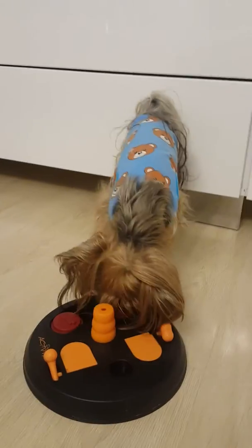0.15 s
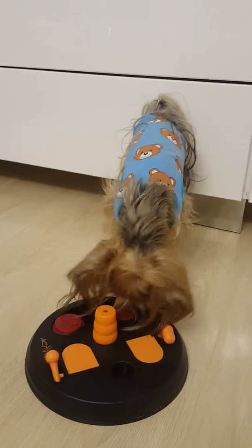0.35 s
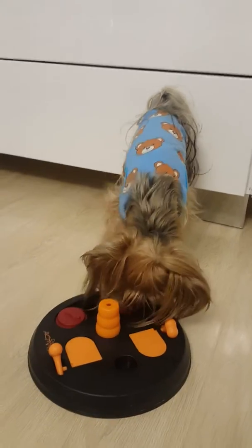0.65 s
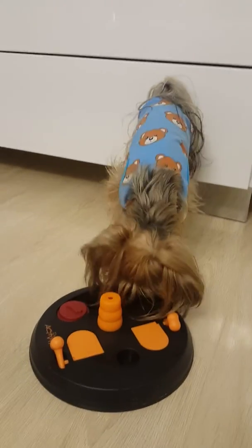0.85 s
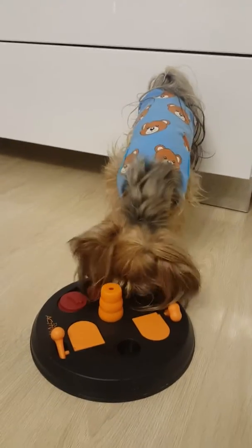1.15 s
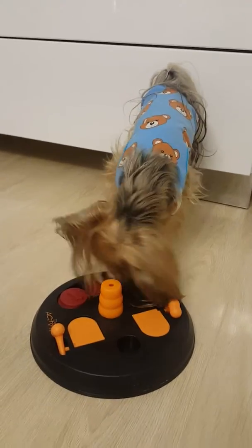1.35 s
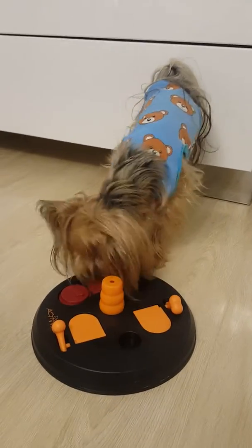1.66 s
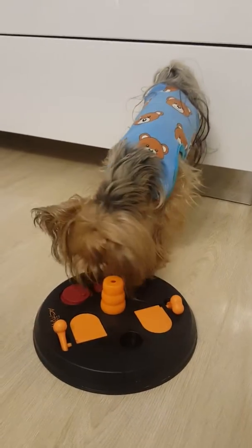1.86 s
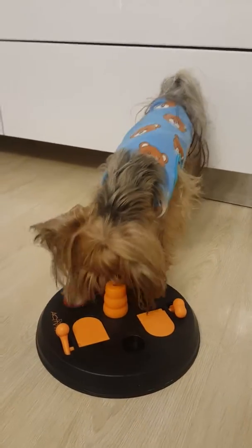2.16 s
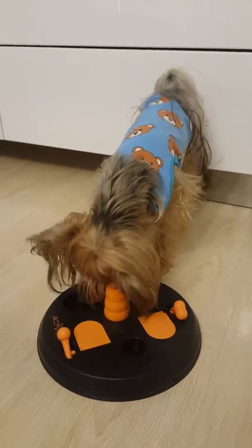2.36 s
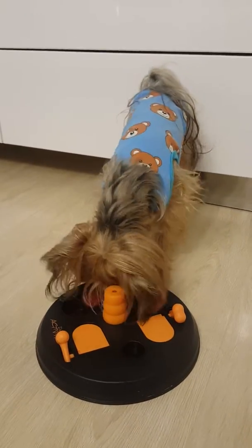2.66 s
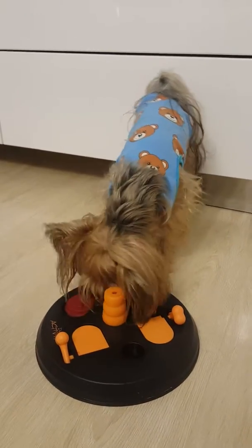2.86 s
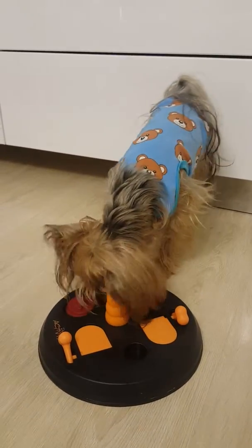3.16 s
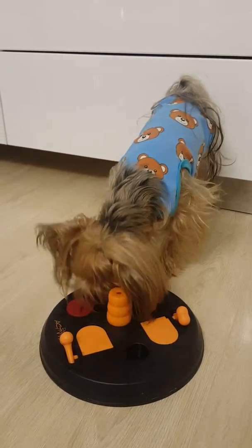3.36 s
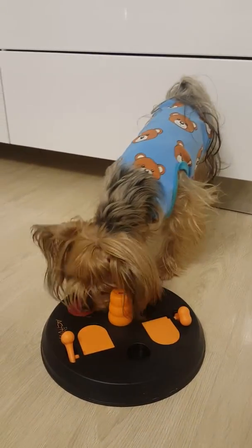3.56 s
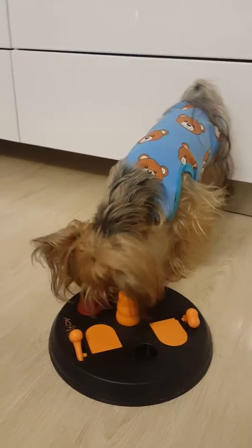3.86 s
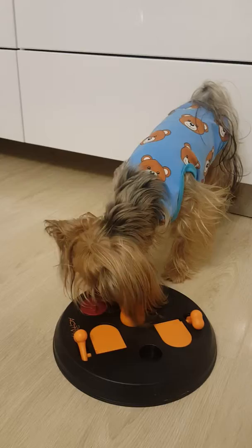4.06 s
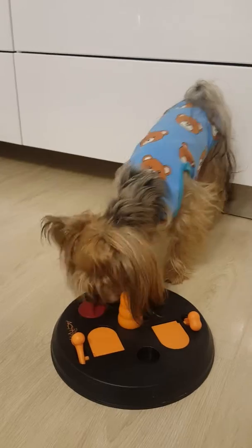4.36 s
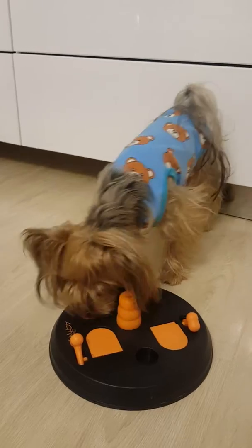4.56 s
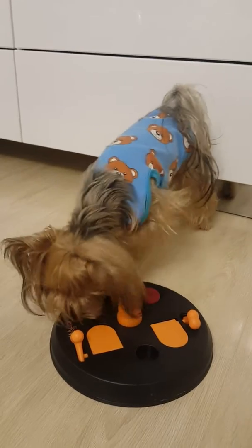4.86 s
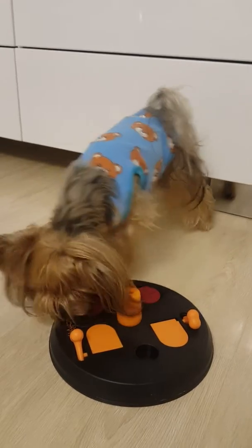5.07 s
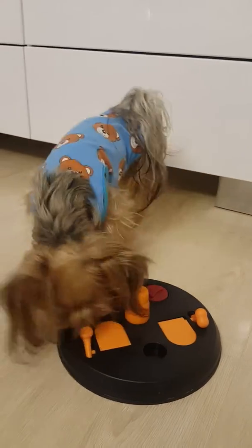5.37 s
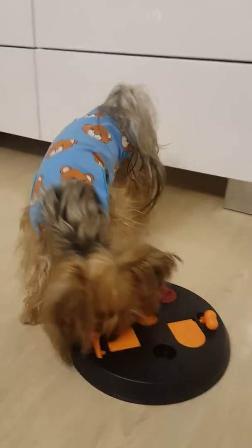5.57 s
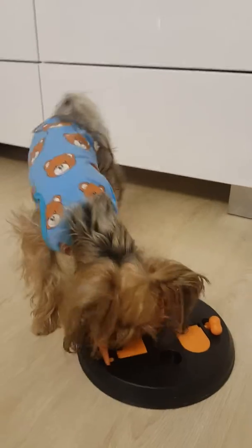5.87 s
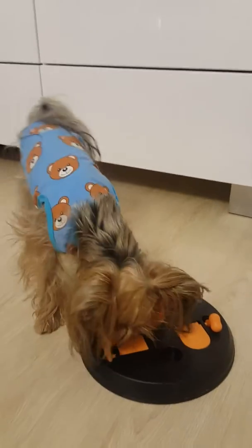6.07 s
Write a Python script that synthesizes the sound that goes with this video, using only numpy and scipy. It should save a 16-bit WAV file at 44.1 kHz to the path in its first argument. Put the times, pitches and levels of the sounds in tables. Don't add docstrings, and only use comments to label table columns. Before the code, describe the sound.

Hollow plastic clacks and rattles in sharp irregular bursts as a small dog noses a treat puzzle on a hard kitchen floor.

```python
import sys
import numpy as np
from scipy import signal
from scipy.fft import rfft, irfft
from scipy.io import wavfile

SR = 44100
rng = np.random.default_rng(int(sys.argv[2]) if len(sys.argv) > 2 else 0)


def ratio(d):
    e = np.asarray(d, float) / 20
    return 10 ** e


def master_out(mix):
    frames = np.transpose(np.atleast_2d(mix))
    ceiling = np.clip(frames, -1, 1)
    pcm = np.round(ceiling * 32767).astype(np.int16)
    wavfile.write(sys.argv[1], SR, pcm)


N = 273859

# contact in seconds, slider level in dB,
# weight on the body in dB, hardness of the contact in dB.
TRAY_BLOWS = [(0.5958, -48.5, 5.5, -6.5), (0.9444, -23, -26, -14), (1.1301, -48, 1, -14.5),
              (1.6177, -32, 2, 1), (1.798, -34.5, 5.5, -4.5), (1.8076, -46, 12, -3.5),
              (1.846, -31, -9.5, -18.5), (2.2576, -46, -14, 1), (2.2789, -30.5, -4, -11.5),
              (2.2959, -15, 0.5, -3.5), (2.305, -19, 1.5, 1), (2.3334, -21.5, 8, 3.5),
              (2.5424, -33.5, 5, -5), (2.8222, -35.5, -16, -22), (2.9996, -53, 12.5, -8),
              (3.4381, -31, -1, -5), (3.444, -52, -10.5, -7), (3.9455, -60.5, 11, -14),
              (4.0373, -39, 8.5, -8), (4.0443, -35.5, 3, 3.5), (4.058, -28.5, 0.5, -10.5),
              (5.4006, -33.5, -1, -10.5), (5.443, -36, -7, -5), (5.8246, -49, 8.5, -11.5)]
DOME_BLOWS = [(0.1322, -61.5, 12.5, -6), (.4184, -68.5, -10, 11), (0.9501, -31.5, -13, -32),
              (2.2718, -41.5, 0, -14.5), (2.8376, -25, -22, -38), (3.0144, -51.5, 1, -12),
              (4.2736, -52.5, 5, 3.5), (5.1612, -70, 8.5, -8), (5.4056, -36.5, -11, -4.5),
              (5.4491, -32, -11, -8.5), (5.4614, -47, 1, 0), (5.5273, -48.5, 2.5, 4),
              (5.9674, -59.5, 12.5, 9.5), (6.1325, -63.5, 9, -5), (6.1659, -42, -4, 1)]
WALL_BLOWS = [(0.0926, -80.5, 20, 11), (0.1378, -57, 3.5, 11), (0.182, -53.5, 5, 7), (.4854, -67, -6, -4),
              (.6953, -32.5, 4, -1.5), (1.6049, -55.5, 1, -23), (1.8568, -53.5, -17, -10.5),
              (2.2329, -59, 3.5, -8.5), (2.3771, -22, -2.5, -0.5), (2.8469, -34, -8.5, -10),
              (3.479, -34, -8.5, -8.5), (5.5587, -40, -0.5, 6), (5.817, -39.5, -10.5, -11),
              (5.9467, -37.5, -2.5, -14.5)]
RIM_BLOWS = [(0.2093, -46.5, -14.5, 7), (.2229, -43, -14, 2), (0.2384, -45, -11, 9),
             (.2714, -52.5, -3.5, 4), (.6298, -61.5, -3, 1), (.6643, -71.5, 20, 13.5),
             (.7276, -15, -6.5, -23.5), (.7317, -16.5, -11, -16.5), (0.7466, -11.5, -17.5, -6.5),
             (1.1035, -43, -4, -22), (2.3381, -16.5, -6.5, -4.5), (2.3414, -18, -0.5, -3),
             (2.3458, -20, 7, -12)]
# cavity and tray in dB (weight adds),
# peg and thin edges in dB (hardness adds).
PLACE_RESPONSES = [
    (-15, 0, 0.011, -12.5),
    (1, -14, 0.0032, -15.5),
    (-1.5, 0.5, 0, -9.5),
    (-12.5, 0.5, 0.0026, -0.5),
]
# frequency in Hz, level in dB, t60 in seconds.
SLIDER_MODES = [(1543, -4.5, 0.02), (1704, 0.5, 0.032), (1863, -2, 0.033), (2125, 0.5, 0.027),
                (2227, -6, 0.022)]
CAVITY_MODES = [(427, -7, 0.019), (509, -4.5, 0.044), (565, -2.5, 0.056), (732, -1, 0.021),
                (685, -11, 0.07)]
TRAY_MODES = [(990, -9.5, .03), (1033, -1.5, 0.058), (1140, -8.5, 0.052), (1238, 1.5, 0.026),
              (1340, -1.5, 0.031)]
PEG_MODES = [(2600, -1.5, 0.016), (2946, 5, 0.0089), (3180, -5.5, 0.012), (3590, -1, 0.0058),
             (4190, -12.5, 0.022)]
EDGE_MODES = [(4400, -0.5, 0.0034), (5840, -2.5, 0.0019), (6320, -1, 0.0023), (7170, -4, 0.0062),
              (8850, -4, .003), (11900, -13, 0.0017), (12330, -14.5, 0.003), (13840, -19, 0.0018),
              (14600, -21.5, 0.0056)]
SQUEAK_MODES = [(4800, -5, 0.041), (6000, -14, .005), (7020, 1.5, 0.025), (7670, -3, 0.013),
                (8850, -2.5, 0.01), (10500, -3, 0.0066), (13170, -12.5, .004)]
FLAP_MODES = [(571.5, -1, 0.098), (1140, -5.5, .04), (1734, -7, .04), (1878, -0.5, 0.052),
              (2260, -9.5, 0.035), (3236, -5.5, 0.026), (4250, -17, 0.014)]
# start in seconds, level in dB, brightness in dB per octave.
FLAP_CLAPS = [(5.3995, -37.5, -0.5), (5.405, -38, 0.5), (5.444, -35, 4), (5.449, -34.5, 2.5),
              (5.461, -40, 0), (5.522, -38, -5), (5.53, -42.5, 0.5), (5.552, -45, -6), (5.559, -32.5, 2),
              (5.819, -47.5, 1.5), (5.948, -36.5, 0), (5.968, -52, -6), (6.168, -45.5, -1)]
# start in seconds, length in seconds, peak in dB, squeak above rub in dB.
RUB_STROKES = [(.135, .03, -57, 1.5), (0.174, .04, -45.5, -22), (1.093, 0.018, -56, -15),
               (1.095, 0.037, -53.5, -17), (2.264, 0.046, -27.5, -14), (2.786, 0.057, -42, -11.5),
               (2.987, .015, -62.5, -15), (3.16, 0.018, -53.5, -8), (3.391, 0.023, -47.5, -9),
               (3.695, 0.062, -46.5, -13.5), (3.992, 0.018, -45, -11), (4.011, 0.019, -53, -2),
               (4.545, .02, -70, -11.5), (4.588, .06, -76, -13), (5.504, 0.032, -40.5, -31),
               (6.117, 0.0093, -52, -11.5), (6.145, 0.014, -60, -14.5)]
# start in seconds, length in seconds, starting level in dB.
SNORT_STROKES = [
    (.195, 0.037, -30),
    (.26, 0.042, -63),
    (1.2, 0.16, -66),
    (1.25, .05, -64.5),
    (4.285, 0.09, -41),
    (5.13, 0.19, -64),
]
# start in seconds, length in seconds, starting level in dB.
WHISTLE_STROKES = [
    (5.68, 0.093, -86),
    (6.05, 0.11, -71),
]
# frequency in Hz, density in dB per Hz.
NOSTRIL_COLOUR = [(290, -27), (500, -6.5), (879, -13.5), (1230, -6.5), (1500, -9.5), (2760, -2), (3580, -9),
                  (3850, -11), (8290, -16.5), (15900, -26.5)]
# start in seconds, peak in dB.
FLOOR_THUMPS = [
    (0.73, -38.5),
    (2.303, -36),
    (2.338, -34),
    (4.032, -69),
    (4.279, -49.5),
]
# frequency in Hz, level in dB, t60 in seconds.
BOARD_MODES = [(117, -0.5, .4), (129, 6.5, 0.2), (156, -5.5, 0.27), (258, 3.5, 0.14), (322, -9.5, .1)]
# delay in seconds, left level in dB, right level in dB.
EARLY_ECHOES = [(.0045, -7, -14.5), (.0105, -18, -14), (.0123, -15, -14), (.019, -16.5, -23.5)]
# frequency in Hz, t60 in seconds.
ROOM_T60 = [(100, 0.95), (260, 0.44), (700, .53), (1840, 0.52), (4850, 0.49), (12800, 0.31)]
# frequency in Hz, level in dB.
TAIL_COLOUR = [(100, -3.5), (400, 0.5), (1500, -3), (5000, -2), (9000, -6.5), (15000, -0.5)]
# frequency in Hz, left-right likeness from 0 to 1.
STEREO_LIKENESS = [(25, .91), (250, .92), (500, .65), (1000, .05), (2000, .45), (4000, .2), (12000, .4)]
# frequency in Hz, density in dB per Hz.
HUM_COLOUR = [(13, -36), (22, -7), (50, -6.5), (122, -9), (156, -0.5), (174, -6.5), (229, -8), (302, -13),
              (347, -12), (444, -32.5), (510, -20), (554, -17.5), (2820, -27.5), (7000, -40.5),
              (16000, -40)]
# frequency in Hz, width in Hz, level in dB.
APPLIANCE_BANDS = [(45.5, 6.3, -79), (161, 8, -75.5), (15400, 500, -91)]

TRAVEL_S, CHATTER_MS, SOFT_BELOW_DB = .0008, 1.9, -25
RING_HZ, RING_WIDTH_HZ, RING_DB = 4950, 110, 5
RUB_SWELL_DB, RUB_ATTACK_S, RUB_RELEASE_DB_PER_S = 21.5, .013, 900.5
SNORT_SAG_DB, SNORT_ATTACK_S, SNORT_RELEASE_DB_PER_S = 13, 0.048, 295.5
WHISTLE_HZ, WHISTLE_WIDTH_HZ = 4940, 120
LEFT_DB, PORT_LAG_SAMPLES = 3.5, 2
ROOM_DB, ROOM_BUILD_S = -3, .007
HUM_DB = -63.5


def knocks():
    out = np.zeros((2, N + 8000))
    t_ms = np.arange(900) / SR * 1000
    parts = [SLIDER_MODES, CAVITY_MODES, TRAY_MODES, PEG_MODES, EDGE_MODES]
    hits = blows()
    luck, where = rng.normal(0, 1, (2, len(hits), 5, 10))
    bounce = rng.random((len(hits), 900))
    size = rng.normal(0, 1, (len(hits), 900))
    for k, (s, db, *above_db) in enumerate(hits):
        part_db = np.add([0] + above_db, [1, 5.0, 0, 8, 15.5])
        gains = ratio(part_db) * [1, 1, -1, -1, 1]
        strength_db = db + max(0, *above_db) + 1.5 * max(0, above_db[3] + 8)
        soft = np.clip((SOFT_BELOW_DB - strength_db) / 12, 0, 1)
        sides = np.where(where[k] < soft - 1.2, -1, 1)[:, :, None]
        body = 0
        for i, (gain, modes) in enumerate(zip(gains, parts)):
            count = len(modes)
            pitch = 1 + .012 * luck[k, i, 9]
            body = body + gain * struck(modes, 2.0 * luck[k, i, :count], 2.14, pitch, sides[i, :count])
        contacts = (bounce[k] < 3000 / SR) * size[k]
        contacts *= (.4 + .5 * soft) * np.exp(-t_ms / (CHATTER_MS + 3.0 * soft))
        contacts[0] = 1 - .4 * soft
        blow = signal.fftconvolve(body, contacts / np.sqrt(np.sum(contacts ** 2)))
        at = round((s + TRAVEL_S) * SR)
        out[0, at:at + len(blow)] += ratio(db + 1.5) * blow
        out[1, at:at + len(body)] += ratio(db - 1.0) * body
    return out[:, :N]


def blows():
    rows = []
    for table, place in zip([TRAY_BLOWS, DOME_BLOWS, WALL_BLOWS, RIM_BLOWS], PLACE_RESPONSES):
        cavity, tray, peg, edges = place
        for s, db, weight, hard in table:
            rows.append((s, db, cavity + weight, tray + weight, peg + hard, edges + hard))
    return sorted(rows)


def struck(modes, weight_db, damping, pitch=1, sides=1, size=4000):
    hz, level_db, t60_s = np.transpose(modes)[:, :, None]
    t = np.arange(size) / SR
    decay_db = 60 * damping * t / t60_s
    ring = ratio(level_db + weight_db[:, None] - decay_db) * np.sin(2 * np.pi * hz * pitch * t)
    ring *= sides * (1 - np.exp(-(1.6 * hz * t) ** 2))
    total = ring.sum(axis=0)
    return total / np.abs(total).max()


def flap():
    out = np.zeros(N + 4000)
    octaves = np.log2(np.array(FLAP_MODES)[:, 0] / 1500)
    luck = rng.normal(0, 1, (len(FLAP_CLAPS), len(FLAP_MODES)))
    for (s, db, bright_db), chance in zip(FLAP_CLAPS, luck):
        at = round(s * SR)
        weight_db = bright_db * octaves + 3.5 * chance
        out[at:at + 4000] += ratio(db) * struck(FLAP_MODES, weight_db, 1.2, sides=np.sign(chance)[:, None])
    return out[:N]


def resonance(x, hz, width_hz):
    r = np.exp(-np.pi * width_hz / SR)
    poles = [1, -2 * r * np.cos(2 * np.pi * hz / SR), r * r]
    return signal.lfilter([(1 - r * r) / 2, 0, (r * r - 1) / 2], poles, x)


def rubs():
    slips = rng.random((2, N)) < 9000 / SR
    slips = slips * ratio(1.7 * np.minimum(rng.exponential(1, (2, N)), 4))
    slips *= rng.choice([-1, 1], (2, N))
    walls = ringing(slips[0], CAVITY_MODES[2:] + TRAY_MODES + SLIDER_MODES + PEG_MODES)
    edges = ringing(slips[1], SQUEAK_MODES)
    shape = RUB_SWELL_DB, RUB_ATTACK_S, RUB_RELEASE_DB_PER_S
    press_rows = [(s, length, db - RUB_SWELL_DB - 3) for s, length, db, _ in RUB_STROKES]
    squeak_rows = [(s, length, db + squeak - RUB_SWELL_DB - 3.5) for s, length, db, squeak in RUB_STROKES]
    return strokes(press_rows, *shape) * walls + strokes(squeak_rows, *shape) * edges


def ringing(x, modes):
    return rms_one(convolve(x, struck(modes, np.zeros(len(modes)), damping=1.0)))


def convolve(x, h):
    return signal.fftconvolve(x, h, axes=-1)[..., :x.shape[-1]]


def rms_one(x):
    return x / np.sqrt(np.mean(x ** 2) + 1e-20)


def strokes(rows, change_db, attack_s, release_db_per_s):
    t, gain = np.arange(N) / SR, np.zeros(N)
    for s, length, db in rows:
        level_db = db + change_db * np.clip((t - s) / length, 0, 1)
        level_db -= release_db_per_s * np.maximum(t - s - length, 0)
        gain += np.clip((t - s) / attack_s, 0, 1) * ratio(level_db)
    return gain


def snorts():
    hz = np.fft.rfftfreq(N, 1 / SR)
    spectrum = rfft(rng.standard_normal(N)) * ratio(at_hz(NOSTRIL_COLOUR, hz + 1))
    air = rms_one(irfft(spectrum, N))
    tone = resonance(air, WHISTLE_HZ, WHISTLE_WIDTH_HZ)
    tone = rms_one(resonance(tone, WHISTLE_HZ, WHISTLE_WIDTH_HZ))
    shape = -SNORT_SAG_DB, SNORT_ATTACK_S, SNORT_RELEASE_DB_PER_S
    puffs = ratio(-2) * strokes(SNORT_STROKES, *shape) * air
    return puffs + ratio(-10) * strokes(WHISTLE_STROKES, *shape) * tone


def at_hz(points, hz):
    table_hz, values = np.transpose(points)
    return np.interp(np.log(hz), np.log(table_hz), values)


def thumps():
    push = np.zeros(N)
    for s, db in FLOOR_THUMPS:
        push[round(s * SR)] = ratio(db)
    boom = struck(BOARD_MODES, np.zeros(len(BOARD_MODES)), damping=0.81, size=30000)
    return convolve(convolve(push, np.hanning(200) / 100), boom)


def first_arrivals():
    response = np.zeros((2, 2000))
    response[0, PORT_LAG_SAMPLES] = ratio(LEFT_DB / 2)
    response[1, 0] = ratio(-LEFT_DB / 2)
    for late_s, left_db, right_db in EARLY_ECHOES:
        at = round(late_s * SR)
        response[0, at] += ratio(left_db)
        response[1, at + 5] += ratio(right_db)
    return response


def kitchen():
    t = np.arange(SR) / SR
    tail = stereo_bands(SR, lambda hz: ratio(at_hz(TAIL_COLOUR, hz) - 60 * t / at_hz(ROOM_T60, hz)))
    tail *= 1 - np.exp(-(t / ROOM_BUILD_S) ** 2)
    return ratio(ROOM_DB) * tail / np.sqrt(np.sum(tail ** 2) / 2)


def stereo_bands(size, shape):
    out, edges_hz = 0, 20 * 2 ** (np.arange(30) / 3)
    white = rng.standard_normal((2, 2, size + 4000))
    for k, (low, high) in enumerate(zip(edges_hz, edges_hz[1:])):
        band = signal.butter(2, [low, high], "band", fs=SR, output="sos")
        mid, side = signal.sosfilt(band, white[k % 2])[:, 4000:]
        hz = np.sqrt(low * high)
        alike = np.clip(at_hz(STEREO_LIKENESS, hz), -1, 1)
        pair = np.sqrt(1 + alike) * mid + np.sqrt(1 - alike) * side * [[1], [-1]]
        out = out + shape(hz) * pair
    return out


def hum():
    out = ratio(HUM_DB) * rms_one(stereo_bands(N, lambda hz: ratio(at_hz(HUM_COLOUR, hz))))
    out = signal.sosfilt(signal.butter(2, 45, "high", fs=SR, output="sos"), out)
    for hz, width_hz, db in APPLIANCE_BANDS:
        white = rng.standard_normal(N) + .3 * rng.standard_normal((2, N))
        out += ratio(db) * rms_one(resonance(resonance(white, hz, width_hz), hz, width_hz))
    return out * ratio([[.4], [-.4]])


def scene():
    contact = knocks() + rubs()
    bright_ring = ratio(RING_DB) * resonance(contact, RING_HZ, RING_WIDTH_HZ)
    sources = contact + bright_ring + flap() + snorts()
    near, radiated = signal.sosfilt(signal.butter(3, 300, "high", fs=SR, output="sos"), sources)
    toy = convolve(near[None], first_arrivals()) + convolve(radiated[None], kitchen())
    return toy + thumps() + hum()


def top_cut(x):
    return signal.sosfilt(signal.butter(12, 16470, fs=SR, output="sos"), x)


def record(dry):
    limited = np.clip(dry - .0005, -.96, .96)
    out = signal.sosfilt(signal.cheby2(10, 50, 16500, fs=SR, output="sos"), limited)
    return top_cut(out)


dry = scene()
out = record(dry)
master_out(out)
```